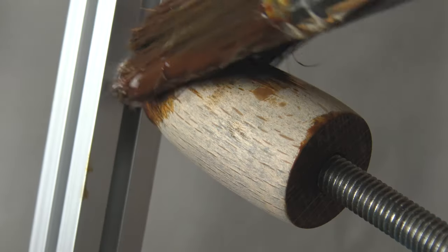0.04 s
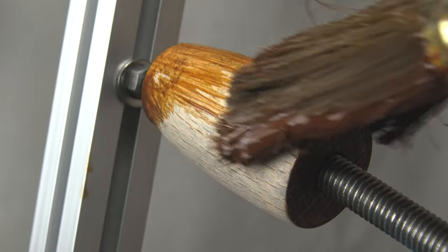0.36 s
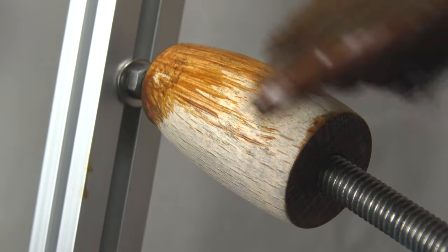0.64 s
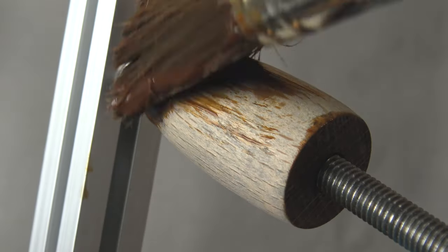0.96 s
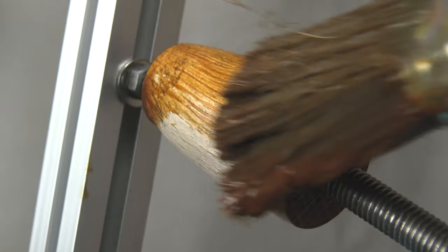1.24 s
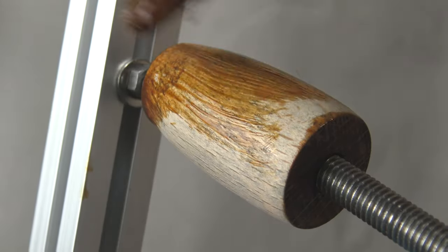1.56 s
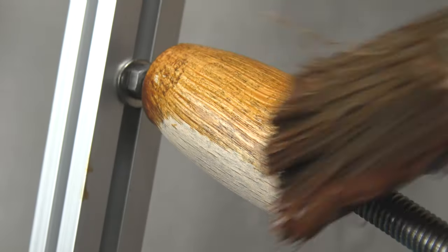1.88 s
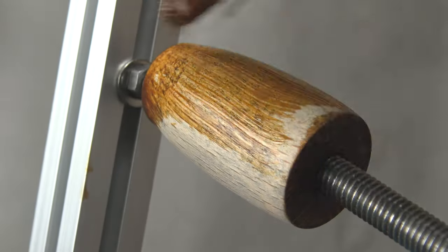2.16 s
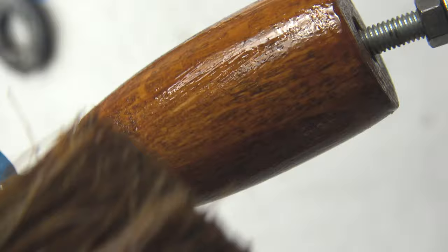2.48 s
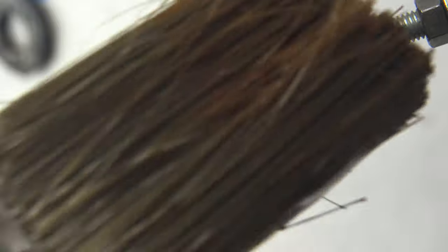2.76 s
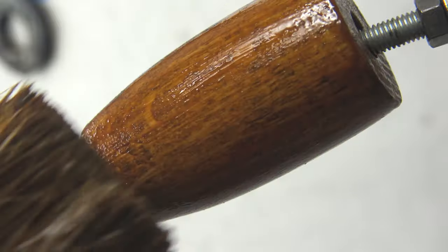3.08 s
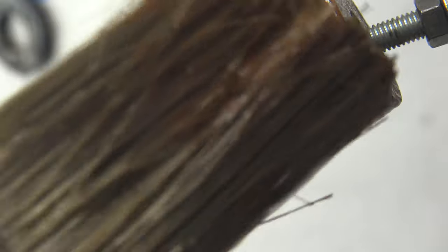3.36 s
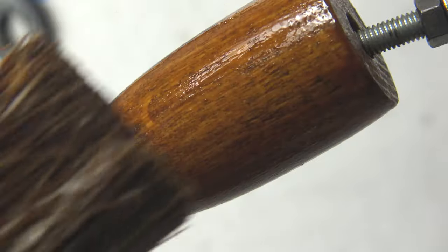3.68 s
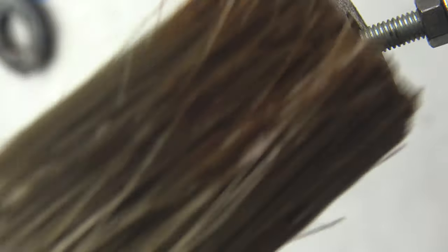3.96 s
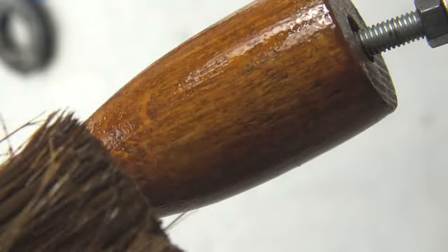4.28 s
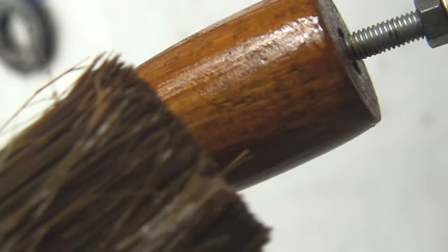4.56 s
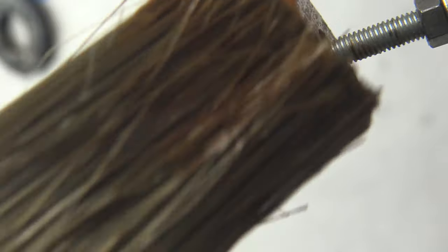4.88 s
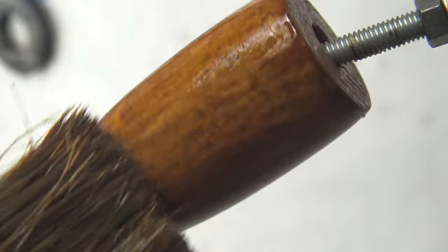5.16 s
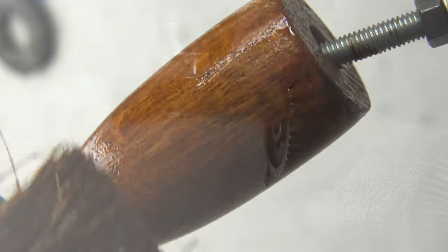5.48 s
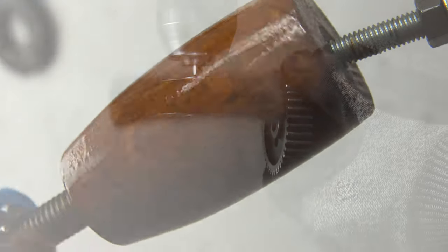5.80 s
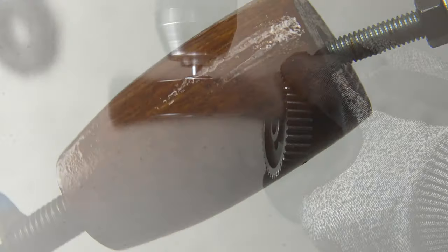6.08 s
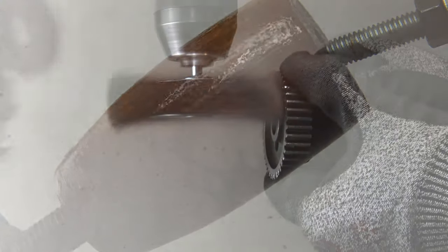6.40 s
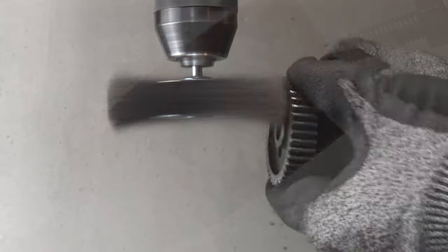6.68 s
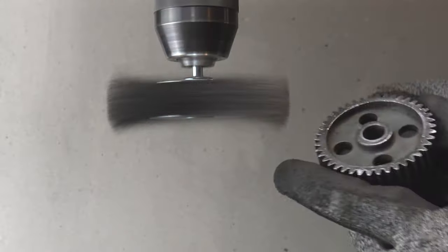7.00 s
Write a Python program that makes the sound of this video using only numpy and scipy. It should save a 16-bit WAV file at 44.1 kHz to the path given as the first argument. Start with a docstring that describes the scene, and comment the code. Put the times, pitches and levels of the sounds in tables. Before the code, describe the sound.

Faint, close brush strokes swish across a wooden handle, the bristles catching and nudging its stand, over a far workshop fan. A much louder drill press gradually rises with a motor hum, a rattle and a light metallic chime, joined by two low bench thuds. Its wire wheel then scrubs a small steel gear with a bright hiss, ringing teeth and a wavering drone. The scrubbing stops just before the end, leaving the motor running.

```python
"""In a quiet workshop with a far fan, a soft brush wipes stain on a wooden handle held on a threaded rod:
bristles swish over the grain, catch and nudge the stand; at a cut at 2.5 s room and swish change colour.
From 3.7 s a drill press fades in, its motor humming, its frame rattling, a wire wheel chiming in the
chuck; the bench bumps twice. At 4.7 s a small steel gear is pressed to the wheel: wires hiss on the
teeth, the gear rings and the spindle drones. At 6.7 s the gear is pulled away and the drill runs on."""
import sys
import numpy as np
from scipy import signal
from scipy.fft import rfft, irfft
from scipy.io import wavfile

SR = 44100
rng = np.random.default_rng(int(sys.argv[2]) if len(sys.argv) > 2 else 0)


def store_wav(level_fs):
    """Save 16-bit WAV to argv[1]."""
    pcm = np.round(np.clip(np.atleast_2d(level_fs), -1, 1) * 32767)
    wavfile.write(sys.argv[1], SR, pcm.T.astype(np.int16))


N = 319284
T = np.arange(N) / SR
SLOW_T = T[::32]   # control-rate clock
HZ = np.maximum(np.arange(N // 2 + 1) * SR / N, 1)
CUT_S = 2.54   # at this cut the room's colour and the swish change abruptly


def from_db(db):
    """Decibels to gain."""
    return 10 ** (np.asarray(db) / 20)


def unit_rms(x):
    """Scale to unit power."""
    return x / np.sqrt(np.mean(x ** 2) + 1e-20)


def automation(points):
    """A breakpoint curve, read at every sample."""
    return np.interp(T, *np.transpose(points))


def eq_curve(points):
    """A breakpoint spectrum in dB, read at every frequency."""
    hz, db = np.transpose(points)
    return np.interp(np.log(HZ), np.log(hz), db)


def filtered(x, response):
    """Pass x through a frequency response."""
    return irfft(rfft(x) * response, N)


def resonance(hz, width):
    """Response of one damped mode, 1 at its peak."""
    return 1 / (1 + 1j * (HZ ** 2 - hz ** 2) / (HZ * width))


def colour(x, spectrum, peaks=()):
    """Pass x through a body with a broad spectrum and narrow peaks or dips; rms 1."""
    peaks_db = sum(lift * np.abs(resonance(hz, width)) ** 2 for hz, width, lift in peaks)
    return unit_rms(filtered(x, from_db(eq_curve(spectrum) + peaks_db)))


def ring_modes(force, modes):
    """Ring a set of modes whose powers add up; rms 1."""
    power = sum(np.abs(from_db(db) * resonance(hz, width)) ** 2 for hz, width, db in modes)
    return unit_rms(filtered(force, np.sqrt(power)))


def noise():
    """White noise."""
    return rng.standard_normal(N)


def tone(cycles):
    """A sine of rms 1 that starts anywhere in its cycle."""
    return np.sqrt(2) * np.sin(2 * np.pi * (cycles + rng.random()))


def drift(rate_hz):
    """Slow random modulation of rms 1."""
    count = len(SLOW_T)
    hz = np.arange(count // 2 + 1) / T[-1]
    slow = irfft(rfft(rng.standard_normal(count)) / (1 + (hz / rate_hz) ** 2), count)
    return np.interp(T, SLOW_T, unit_rms(slow))


def ticks(per_s, spread_db=0):
    """Tiny impacts at random moments, of uneven size; rms 1."""
    impacts = (rng.random(N) < per_s / SR) * noise()
    return unit_rms(impacts * from_db(spread_db * np.clip(noise(), -2, 2)))


def held(t, start, end, attack_s, release_s):
    """Envelope that rises to 1 at start, holds until end and dies away."""
    outside = np.maximum(start - t, 0) / attack_s + np.maximum(t - end, 0) / release_s
    return np.exp(-np.minimum(outside, 20))


def swell(at_s, half_width_s):
    """A bell-shaped envelope."""
    return np.exp(-0.5 * np.minimum(((T - at_s) / half_width_s) ** 2, 100))


def soft_knocks(touches, damping):
    """Each soft touch is a short swell of noisy force into one damped mode."""
    out = np.zeros(N)
    for at_s, db, hz, half_width_s in touches:
        push = swell(at_s, half_width_s)
        mode = signal.iirpeak(hz, 1 / damping, fs=SR)
        knock = signal.lfilter(*mode, signal.lfilter(*mode, noise() * push))
        out += from_db(db) * unit_rms(knock) * np.sqrt(np.mean(push ** 2))
    return out


# room tone bed: f/Hz, relative level/dB
ROOM_EQ = [(15, -22), (25, -9), (53, -15.5), (188, -7), (305, -6.5), (368, -6.5), (482, -7.5), (722, -10),
           (1020, -6.5), (1170, -9), (1410, -9.5), (2300, -15), (15500, -21.5)]
# the far fan's resonances, early and late: f/Hz, width/Hz, lift/dB
FAN_EARLY = [(103, 15, 10), (310, 18, 8), (904, 35, 11)]
FAN_LATE = [(193, 29, 2.4), (890, 28, 7), (1000, 51, 3.1)]


def workshop():
    """Still air with a far fan; at CUT_S its colour shifts and a thin whine joins."""
    early = from_db(-69.6) * colour(noise(), ROOM_EQ, FAN_EARLY)
    late = from_db(-69.8) * colour(noise(), ROOM_EQ, FAN_LATE)
    whine = from_db(-80) * tone(1000 * T + 0.091 * drift(6))
    return np.where(T < CUT_S, early, late + whine)


# dull thuds: t/s, level/dB, f/Hz, half-width/s
BENCH_THUDS = [(4.415, -48, 45, 0.037), (4.675, -50, 50, .03)]


def bench():
    """Bumps at the bench push a low, heavily damped mode."""
    return soft_knocks(BENCH_THUDS, damping=1.0)


# strokes and light dabs: t/s, length/s, relative level/dB, attack/s, release/s, treble lift/dB
BRUSH_STROKES = [(0.026, 0.023, -68, .006, .018, -1), (0.106, .52, -63.5, 0.025, 0.018, 0),
                 (0.994, 0.037, -63.5, .005, 0.02, -2), (1.088, 0.32, -60.3, .016, 0.064, -1),
                 (1.613, .027, -67, .008, .015, -6), (1.708, .03, -63, 0.013, .015, -5),
                 (1.765, 0.24, -58, .018, 0.015, 0), (2.14, .07, -74, .015, .015, -8),
                 (2.329, 0.19, -59.5, 0.024, 0.011, 1.5), (2.926, .13, -59, 0.034, .016, -1),
                 (3.258, .022, -76, .008, .008, -6), (3.535, 0.089, -59.5, 0.055, 0.013, -2)]


def stroke_envelopes(arch_db=5.5):
    """Bristles land, bear down hardest mid-stroke and lift off; gains of the swish and of its treble."""
    body, top = 0, 0
    for start, length, db, attack_s, release_s, treble_db in BRUSH_STROKES:
        along = np.clip(2 * (SLOW_T - start) / length - 1, -1, 1)
        contact = held(SLOW_T, start, start + length, attack_s, release_s)
        gain = from_db(db - arch_db * along ** 2) * contact
        body += gain
        top += gain * from_db(treble_db)
    return np.interp(T, SLOW_T, body), np.interp(T, SLOW_T, top)


# rumble of the handle's stand: f/Hz, relative level/dB
STAND_EQ = [(25, 2), (55, 3), (130, 6), (320, 3), (500, -20), (2000, -50)]
# the brush nudges the handle: t/s, level/dB, f/Hz, half-width/s
HANDLE_NUDGES = [(0.029, -81, 288, 0.0094), (1.229, -67, 593, 0.0036), (1.622, -70, 390, .008),
                 (1.675, -66, 490, 0.022), (1.696, -63, 520, 0.0063), (2.345, -68, 574, 0.013),
                 (2.5, -67, 308, 0.033), (3.558, -63, 620, 0.0061)]


def stand(stroke_gain):
    """The stand rumbles under the strokes and one firmer shove; the nudged handle knocks."""
    push = from_db(-24) * stroke_gain + from_db(-77) * swell(2.4, 0.18)
    return push * colour(noise(), STAND_EQ) + soft_knocks(HANDLE_NUDGES, damping=0.67)


# bristle swish before and after the cut: f/Hz, relative level/dB
EARLY_SWISH_EQ = [(250, -12.5), (700, -9), (1300, -4.5), (1800, -4), (3300, -3.5), (4600, 0), (7000, -3.5),
                  (10500, -4), (16000, -14)]
LATE_SWISH_EQ = [(250, -13), (700, -9), (1300, -12), (2000, -1), (4000, -8), (7000, -2.5), (10500, -4),
                 (16000, -11)]
# peaks and dips in each swish: f/Hz, width/Hz, lift/dB
EARLY_SWISH_PEAKS = [(323, 15, 19.5), (1770, 200, 6.5), (2090, 250, 9), (2500, 250, 0), (2840, 250, 3.5),
                     (3340, 180, -4.5), (4050, 500, 4), (4830, 400, 0.5), (5320, 150, 3), (6760, 200, 4),
                     (10300, 500, 0)]
LATE_SWISH_PEAKS = [(1950, 200, -3), (2780, 210, 1), (4800, 300, 9), (5200, 300, -4), (6460, 500, 4.5)]
# tacky bristles squeak, single ones flick free: t/s, level/dB, f/Hz, half-width/s
BRISTLE_SQUEAKS = [(1.008, -68, 4200, .015), (3.02, -68, 2800, .02), (3.066, -69, 1900, .012),
                   (3.6, -68, 2800, .015)]
BRISTLE_FLICKS = [(1.165, -61, 12200, .018), (2.157, -65, 3500, .002), (2.176, -68, 3000, .002)]


def brush():
    """Thousands of bristles slip over the grain and a few catch; the later swish is brighter."""
    body_gain, treble_gain = stroke_envelopes()
    early = from_db(2.5) * colour(ticks(per_s=24000), EARLY_SWISH_EQ, EARLY_SWISH_PEAKS)
    late = from_db(3.4) * colour(ticks(per_s=24000, spread_db=-1.5), LATE_SWISH_EQ, LATE_SWISH_PEAKS)
    swish = np.where(T < CUT_S, early, late) * from_db(0.4 * drift(30))
    treble = filtered(swish, 1 / (1 + (5500 / HZ) ** 4))
    rumble = stand(body_gain)
    catches = soft_knocks(BRISTLE_SQUEAKS, damping=0.14) + soft_knocks(BRISTLE_FLICKS, damping=0.45)
    return body_gain * (swish - treble) + treble_gain * treble + rumble + catches


# belt and bearing rattle: f/Hz, relative level/dB
RATTLE_EQ = [(25, -23), (60, -20.5), (110, -5.5), (180, -3), (330, -5.5), (520, -3), (760, -5), (930, -7.5),
             (1300, -6), (2400, -14), (4400, -12), (6200, -13), (9800, -17), (11000, -23), (13000, -24),
             (16000, -36)]
# frame and belt guard: f/Hz, width/Hz, lift/dB
FRAME_RESONANCES = [(201, 67, 6), (292, 36, 11), (362.6, 26.6, 13.5), (466.5, 16.7, 10.5), (624, 37, 8.5),
                    (715, 60, 9.5), (1137, 32, 4.5), (1239, 43, 4), (1309, 25, 6.5), (1440, 25, -8),
                    (1518, 18, 3.5)]
# chime of the free wheel and chuck: f/Hz, width/Hz, relative level/dB
CHUCK_MODES = [(1874, 16, 3), (2200, 22, 6), (2430, 25, -8), (2620, 30, -6), (2865, 45, -3),
               (3140, 100, -5), (3730, 110, -5), (4045, 60, -3), (4200, 150, -9), (4640, 120, -9),
               (4910, 50, -7), (5390, 45, -0.5)]
# mains hum of the motor: f/Hz, level/dB
MOTOR_HUM = [(100, -50), (200, -36.5), (300, -40), (400, -45)]


def drill(turns, load, chatter):
    """The motor hums, belt and bearings rattle, the wheel wobbles and chimes until load steadies it."""
    shake = from_db(0.31 * np.cos(2 * np.pi * turns) + 0.77 * drift(18))
    rattle = colour(ticks(per_s=24000) * shake, RATTLE_EQ, FRAME_RESONANCES)
    rattle *= from_db(-24.5 - 1.5 * load)
    chime = ring_modes(ticks(per_s=7400, spread_db=-2) * shake, CHUCK_MODES)
    chime *= from_db(-30.5 - 4.5 * load)
    hum = sum(from_db(db + 2 * drift(2.1)) * tone(hz * T) for hz, db in MOTOR_HUM)
    wobble = unit_rms(filtered(noise(), resonance(hz=200.2, width=38.5) ** 2))
    wobble *= from_db(-29.5 - 17.5 * load)
    return from_db(3 * chatter) * (rattle + wobble) + chime + hum


# partials of the drone: multiple of the turn rate, relative level/dB
DRONE_PARTIALS = [(3, -13), (4, -18.5), (5, -18.5), (7, -15.5), (8, -4.5), (9, -2.5), (10, 1.5), (11, -7),
                  (12, 4.5), (13, -10), (15, -12), (16, -6), (20, -16.5), (23, -32)]
# fader rides for the drone and the low boom: t/s, level/dB
DRONE_FADER = [(4.7, -42), (5.0, -35), (5.35, -27.5), (5.85, -24), (6.5, -26), (6.95, -41)]
BOOM_FADER = [(4.7, -39), (4.95, -31), (5.67, -32.5), (5.81, -54), (5.92, -24.5), (6.6, -34.5), (6.65, -53),
              (6.74, -32), (7.24, -49)]


def spindle(turns, boom_order=6, buzz_order=16):
    """The uneven wheel drums on the gear at multiples of its turn rate, wavering as the grip shifts."""
    boom = from_db(automation(BOOM_FADER)) * tone(boom_order * turns + 0.011 * drift(11))
    last_push = swell(6.57, 0.11)
    buzz = from_db(-30) * last_push * tone(buzz_order * turns + 0.055 * drift(6.5))
    drone = sum(from_db(db + 2 * drift(7)) * tone(order * turns + 0.06 * drift(9))
                for order, db in DRONE_PARTIALS)
    return boom + buzz + from_db(automation(DRONE_FADER)) * unit_rms(drone)


# hiss of wires on steel: f/Hz, relative level/dB
HISS_EQ = [(200, -23.5), (500, -3.5), (900, -11.5), (1900, -6), (2700, -2.5), (4500, 0.5), (5800, -2.5),
           (8000, -4.5), (11500, -6.5), (13300, -4.5), (16000, -9.5)]
# the glove-damped gear's ring, its teeth's growl and rasp: f/Hz, width/Hz, relative level/dB
GEAR_MODES = [(2540, 90, -6), (2900, 220, -2), (3122, 80, 5), (3300, 40, -5), (3480, 30, -0.5),
              (3770, 40, -7), (4028, 42, -2.5), (4297, 42, -3), (4390, 25, -2.5), (4600, 120, -11),
              (4900, 100, -9), (6553, 65, 2), (8940, 180, -12), (10500, 120, -11.5), (13200, 180, -12)]
TOOTH_GROWL = [(1050, 160, -6), (1270, 33, -1.5), (1390, 83, -2)]
TOOTH_RASP = [(2580, 400, 1), (3700, 900, -3)]


def wire_wheel(turns, force_db, chatter, soft_strike_hz=5200):
    """Countless wire tips flick across the teeth and ring the gear; uneven tufts come round each turn."""
    tufts = from_db(0.4 * np.cos(2 * np.pi * turns) + 0.13 * drift(58))
    hiss = from_db(-19 + force_db) * colour(ticks(per_s=42000, spread_db=3) * tufts, HISS_EQ)
    strikes = ticks(per_s=22000, spread_db=2.5) * tufts
    ring = ring_modes(strikes, GEAR_MODES)
    high_ring = filtered(ring, 1 / (1 + (soft_strike_hz / HZ) ** 8))
    ring += high_ring * (from_db(0.4 * force_db) - 1)   # a light touch rings duller
    ring *= from_db(-22.5 + 0.76 * force_db + 1.8 * chatter)
    growl = from_db(-40 + force_db + 10 * chatter) * ring_modes(strikes, TOOTH_GROWL)
    last_push = swell(6.64, 0.13)
    rasp = from_db(-27.5) * last_push * ring_modes(noise() * tufts, TOOTH_RASP)
    return hiss + ring + growl + rasp


# the spindle's turn rate: t/s, f/Hz
TURN_RATE = [(5.35, 31.2), (5.6, 30.4), (5.9, 30.69), (6.25, 30.2), (6.65, 29.99), (7.24, 30.13)]
# how hard the hand presses, relative to full force: t/s, level/dB
HAND_FORCE = [(4.7, -14), (5.02, -12.5), (5.22, -6), (5.7, -1.9), (6.1, -1.36), (6.66, -0.5), (6.8, -3.5)]


def gear_on_wheel(settle_s=0.057):
    """The hand presses the gear to the wheel; the drill takes up and sheds the load with a short lag."""
    turns = np.cumsum(automation(TURN_RATE)) / SR
    force_db = automation(HAND_FORCE)
    contact = held(T, start=4.69, end=6.745, attack_s=0.015, release_s=0.053)
    chatter = swell(5.225, 0.29)   # the teeth chatter as the gear is first worked in
    pole = np.exp(-1 / (settle_s * SR))
    load = signal.lfilter([1 - pole], [1, -pole], contact * from_db(force_db))
    return drill(turns, load, chatter) + contact * wire_wheel(turns, force_db, chatter) + spindle(turns)


def stereo(x, width, balance_db=0, decay_s=0.044):
    """Left and right are nearly alike; dense early echoes off the walls make the side signal."""
    echoes = noise() * np.exp(-T / decay_s) * (T > 0.002)
    mid = rfft(x)
    side = mid * from_db(eq_curve(width)) * rfft(echoes) / np.linalg.norm(echoes)
    pan = from_db(balance_db / 2)
    return irfft(np.array([(mid + side) * pan, (mid - side) / pan]), N)


# stereo width, as side relative to mid: f/Hz, level/dB
HANDWORK_WIDTH = [(60, -21), (130, -16), (700, -14), (1200, -26), (1700, -36), (2800, -36), (4200, -22),
                  (7000, -19), (10000, -22), (15000, -23)]
MACHINE_WIDTH = [(60, -26), (200, -31), (500, -26), (900, -27), (1500, -42), (2200, -60), (4200, -60),
                 (5200, -34), (6500, -25), (9000, -36), (15000, -32)]
# the machine stands a little off centre, left minus right: f/Hz, level/dB
MACHINE_PAN = [(60, 2.0), (130, 1.4), (250, -0.3), (400, -2.1), (750, -1.8), (1300, -0.4), (2200, 0)]


def scene():
    """Room and brush first, then the machine fades up evenly to full level."""
    fade_start_s, cut_in_s, fade_end_s = 3.692, 3.72, 5.62
    fade = np.clip((T - fade_start_s) / (fade_end_s - fade_start_s), 0, 1) * (T > cut_in_s)
    machine = stereo(gear_on_wheel(), MACHINE_WIDTH, eq_curve(MACHINE_PAN))
    handwork = stereo(workshop() + brush() + bench(), HANDWORK_WIDTH)
    return handwork + fade * machine


def record(dry, cutoff_hz=15850):
    """A steep low-pass takes off the very top."""
    return signal.sosfilt(signal.ellip(12, 0.1, 80, cutoff_hz, fs=SR, output="sos"), dry)


dry = scene()
out = record(dry)
store_wav(out)
```